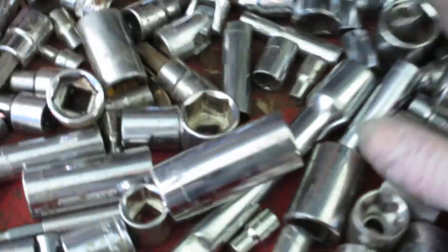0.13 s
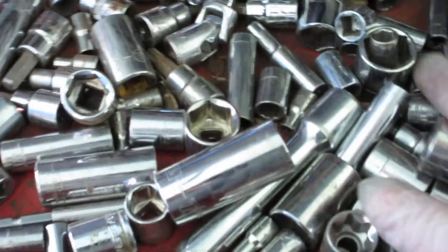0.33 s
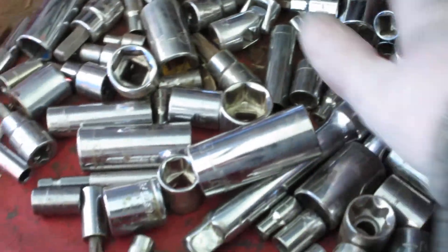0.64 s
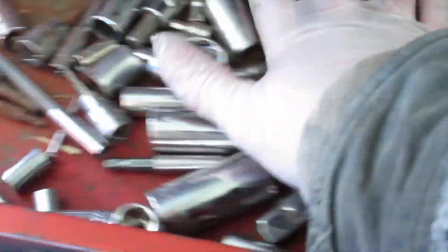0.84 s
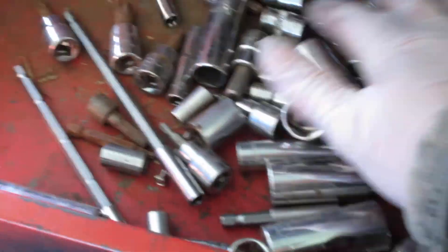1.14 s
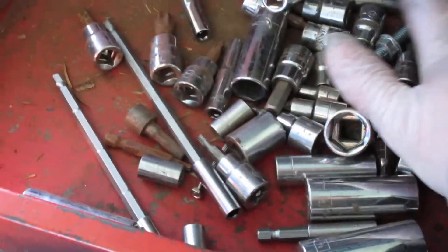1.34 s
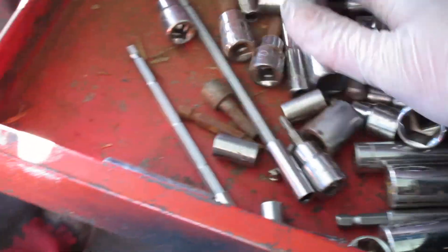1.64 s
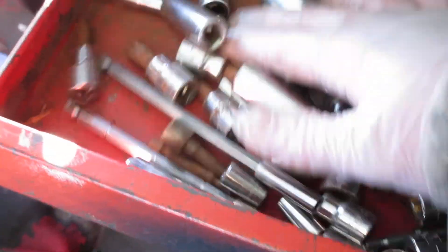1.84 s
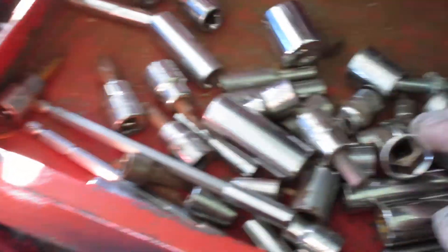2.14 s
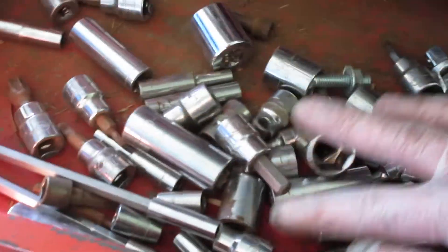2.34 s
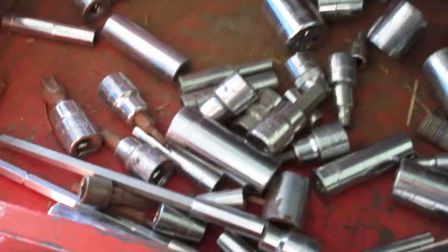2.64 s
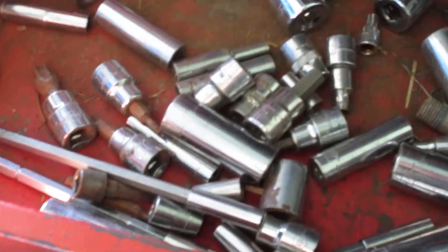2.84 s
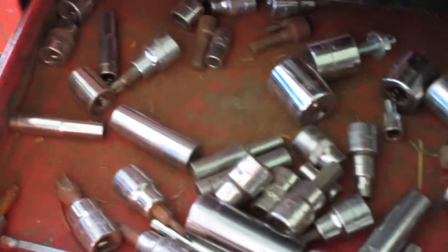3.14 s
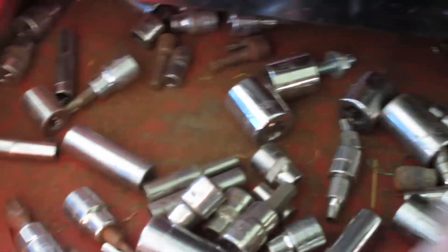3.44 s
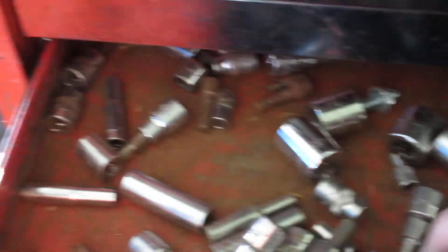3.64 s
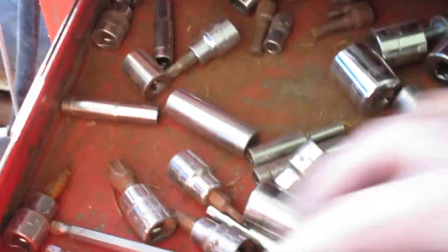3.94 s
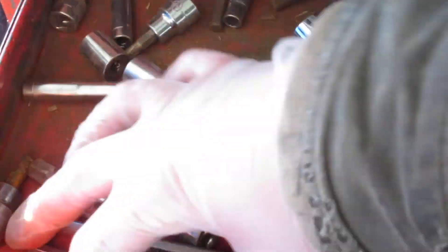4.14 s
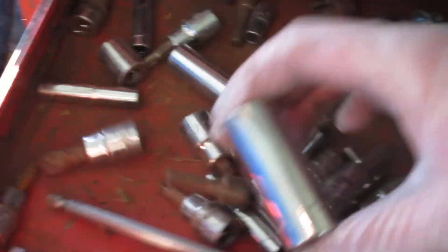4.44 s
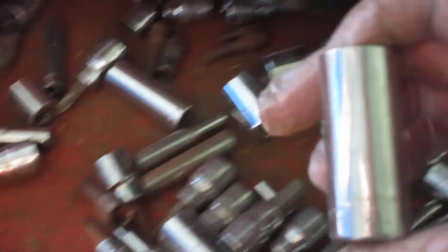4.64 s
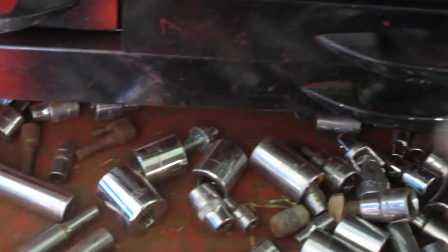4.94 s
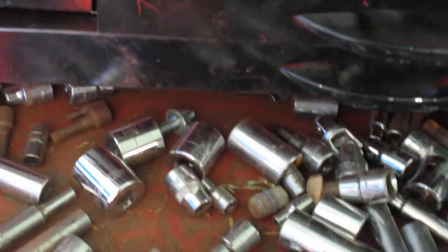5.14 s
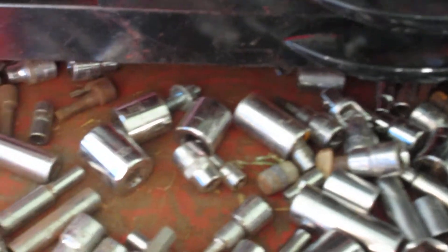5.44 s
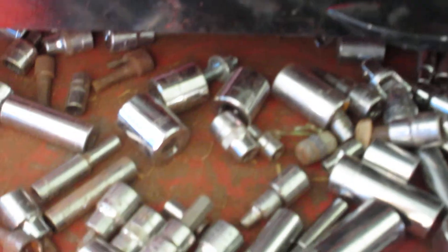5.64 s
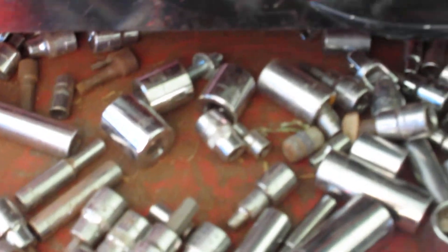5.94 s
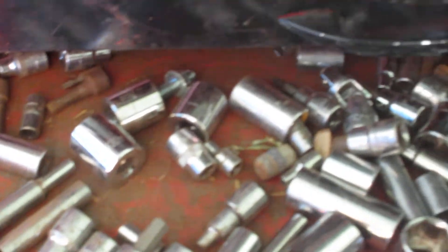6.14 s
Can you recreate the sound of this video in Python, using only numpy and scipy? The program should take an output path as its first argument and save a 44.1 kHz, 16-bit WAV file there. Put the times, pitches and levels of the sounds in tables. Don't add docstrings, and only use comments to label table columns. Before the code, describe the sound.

Close-up metallic rummaging: steel sockets bang together, scrape and roll over a thin metal drawer, some singing briefly at high pitch before being damped. Busy surges fill the first three seconds, shorter handfuls follow, then a quiet second with soft cloth rubbing and low room tone. A final hard clank and rattle ends it. Short, small-workshop reflections; treble-rich but slightly limited camera sound.

```python
import sys
import numpy as np
from scipy import signal
from scipy.fft import rfft, irfft
from scipy.io import wavfile
from scipy.ndimage import uniform_filter1d

SR = 44100
rng = np.random.default_rng(int(sys.argv[2]) if len(sys.argv) > 2 else 0)


def transcribe(signal):
    frames = np.atleast_2d(signal).T
    limited = np.clip(frames, -1, 1)
    pcm = np.round(limited * 32767).astype(np.int16)
    wavfile.write(sys.argv[1], SR, pcm)


def elevation(decibels):
    levels = np.asarray(decibels, float)
    return 10 ** (levels / 20)


N = 277830

# pitch_hz, level_db, t60_s
DRAWER = [(283, 2, 0.049), (356, 1, 0.03), (415, -1, 0.064), (507, 2.5, 0.028), (595, -13.5, 0.054),
          (750, -3, 0.027), (927, -9, 0.066), (1095, -6, 0.025)]
# frequency_hz, level_db
STEEL = [(15, -39), (25, -76), (152, -29.5), (274, -6), (433, -8), (567, 4), (631, 0), (919, 0.5),
         (1110, -7), (1800, -1), (12200, -10), (14300, -24.5), (15500, -22)]


def along(points, hz):
    point_hz, values = np.transpose(points)
    return np.interp(np.log(hz + 1), np.log(point_hz + 1), values)


def unit(x):
    return x / np.sqrt(np.mean(x ** 2) + 1e-20)


def coloured(x, points):
    cepstrum = irfft(np.log(elevation(along(points, np.fft.rfftfreq(4096, 1 / SR))) + 1e-6))
    cepstrum[1:2048] *= 2
    cepstrum[2049:] = 0
    response = irfft(np.exp(rfft(cepstrum)))[:2048]
    response = response.reshape((1,) * (x.ndim - 1) + (-1,))
    return signal.fftconvolve(x, response, axes=-1)[..., :x.shape[-1]]


def without_bass(x):
    return coloured(x, [(40, -70), (270, 0)])


def split(x):
    low_hz, high_hz = 1100, 5200

    def cut(hz, kind):
        return signal.sosfilt(signal.butter(3, hz, kind, fs=SR, output="sos"), x)

    return cut(low_hz, "low"), cut([low_hz, high_hz], "band"), cut(high_hz, "high")


def crest(rows, size):
    return rows / np.sqrt(abs(uniform_filter1d(2 * rows ** 2, size)).max(axis=1, keepdims=True))


def place(rows, first):
    at = first + np.arange(rows.shape[1])
    return np.bincount(at.ravel(), rows.ravel(), N + SR)[:N]


def sample_at(s):
    return np.round(s * SR).astype(int)


def clinks(count, t, low_hz, high_hz, t60):
    out = 0
    for pitch, size, life in rng.random((count, 3, 7, 1)).transpose(2, 1, 0, 3):
        hz = low_hz * (high_hz / low_hz) ** pitch
        decay_db = -10 * size - 60 * t / (t60 * (.5 + life))
        out = out + elevation(decay_db) * np.sin(2 * np.pi * hz * t)
    return out


def singers():
    # start_s, pitch_hz, level_db, life_s
    free = [(0, 14630, -51, .13), (.17, 14420, -39, .065), (.31, 14470, -53, .05), (.862, 14640, -50, .06),
            (1.04, 7240, -46, .033), (1.979, 9580, -37, .037), (2.46, 11690, -30, .06),
            (2.713, 12630, -43, .22), (2.74, 14470, -59, .15), (2.85, 11650, -69, .06),
            (3.48, 13500, -70, .1), (3.728, 14640, -37, .25), (3.745, 12680, -38, .16),
            (3.75, 4995, -26, .075), (3.75, 9560, -36, .025), (4.42, 11120, -45, .06),
            (4.535, 12070, -39, .04), (4.595, 12100, -47, .035), (4.62, 7300, -60, .08)]
    # start_s, pitch_hz, level_db
    wedged = [(.163, 13180, -25), (.258, 5030, -31), (.375, 12740, -42), (.368, 5020, -31),
              (.37, 14570, -35), (1.111, 12260, -24.5), (1.118, 12100, -33), (1.39, 3400, -42),
              (1.45, 11770, -14), (1.54, 12170, -38), (1.651, 11300, -34), (1.728, 12080, -20),
              (1.804, 12310, -32), (1.809, 12070, -28), (1.866, 12140, -35), (1.887, 12070, -34),
              (1.93, 9500, -36), (1.979, 7230, -22), (1.98, 12360, -24), (1.712, 7230, -22),
              (1.787, 7250, -35), (2.444, 12230, -28), (2.484, 13230, -22), (2.612, 12300, -36),
              (2.713, 14700, -35), (3.129, 9400, -32), (3.173, 9600, -25.5), (3.226, 9340, -37),
              (3.363, 1500, -55.5), (3.415, 1700, -38.5), (3.614, 9520, -45), (3.655, 12160, -37),
              (4.13, 7450, -32.5), (4.262, 13440, -49), (4.284, 7210, -38), (4.288, 12100, -47),
              (4.417, 11120, -42), (4.433, 13930, -39), (4.507, 12400, -45), (4.51, 7220, -30.5),
              (4.829, 1760, -54)]
    # start_s, pitch_hz, level_db
    blips = [(0.368, 12150, -22.5), (1.178, 12260, -23), (1.672, 12430, -24), (2.413, 9600, -32),
             (2.529, 10160, -29), (2.565, 5600, -20.5), (2.584, 4930, -25), (2.584, 9370, -23),
             (3.058, 3870, -18.5), (3.172, 6300, -42), (3.226, 6700, -43), (3.761, 9900, -34),
             (3.822, 9730, -36), (3.845, 9500, -31)]
    free_t60_s, wedged_t60_s, blip_t60_s, wedged_life_s = .3, 0.073, 0.036, .04
    return ([(s, hz, db, free_t60_s, life) for s, hz, db, life in free]
            + [(*row, wedged_t60_s, wedged_life_s) for row in wedged]
            + [(*row, blip_t60_s, wedged_life_s) for row in blips])


def rings():
    twin_step, twin_db, twin_t60_s = 1.027, -5, .03
    out = np.zeros(N + SR)
    for s, hz, db, t60, life in singers():
        t = np.arange(int((life + .03) * SR)) / SR
        drift = 0.0068 / np.sqrt(t60) * np.cumsum(rng.standard_normal(SR // 2))[:len(t)]
        onset = 1 - np.exp(-t / 0.00036)
        touch = elevation(-60 * np.maximum(t - life, 0) / 0.036)
        waver = 1 + 0.14 * np.sin(3 * drift)
        ring = elevation(db - 60 * t / t60) * onset * touch * waver * np.sin(2 * np.pi * hz * t + drift)
        twin = elevation(db + twin_db - 60 * t / twin_t60_s) * np.sin(2 * np.pi * hz * twin_step * t + drift)
        out[round(s * SR):][:len(t)] += ring + twin
    return out[:N]


def background():
    # time_s, level_db
    gain = [
        (0, -61),
        (.55, -89),
        (1.4, -81),
        (2.2, -82.5),
        (2.9, -79),
        (3.3, -74.5),
        (5.03, -74),
        (5.2, -68.5),
        (5.9, -69),
        (6.3, -74.5),
    ]
    t = np.arange(N) / SR
    gain_db = np.interp(t, *np.transpose(gain))
    hum = np.sqrt(2) * np.sin(2 * np.pi * 70.6 * t)
    # frequency_hz, level_db
    air = [(40, -28.5), (190, -16), (305, -8), (410, -9), (666, -15.5), (1170, -12), (2060, -19.5),
           (10400, -28), (15500, -38.5)]
    return elevation(gain_db) * (hum + elevation(9.5) * unit(coloured(rng.standard_normal(N), air)))


def heap():
    # peak_s, swell_s, settle_s, scrape_db, rumble_over_scrape_db
    sweeps = [(0.146, 0.14, 0.28, -18, -3.5), (.33, 0.11, 0.21, -35.5, -6.5), (.617, 0.01, 0.14, -31, -27),
              (.724, 0.019, 1, -36.5, -11), (.852, 0.24, 0.41, -23.5, -4.5), (1.088, 1, 0.14, -37, 1.5),
              (1.298, 0.54, 0.19, -44.5, 8), (1.735, 0.41, 0.59, -21, -1.5), (2.05, .2, 0.11, -40, -1),
              (2.2, 0.032, 0.1, -45, 7.5), (2.41, 0.064, 0.32, -28, -10.5), (2.485, 0.1, 0.3, -26.5, 0),
              (2.76, .06, 0.19, -44, 2.5), (3.047, 0.12, 0.16, -30, -5.5), (3.754, 0.11, 0.19, -23, -2),
              (4.166, 0.11, 0.26, -38, -6), (4.416, 0.13, .09, -25, -2), (4.542, 0.089, 0.17, -29.5, 4),
              (4.74, 0.033, 0.23, -46.5, -1), (3.43, 0.13, 0.52, -56, -1), (5.958, 0.017, 0.08, -51.5, 15),
              (6.072, 0.024, 0.22, -33.5, -1.5)]
    swell_db, rest_db = 30, -84
    rounding = 1.137
    jingle_db, jingle_grows = -9, 1.24
    peak, swell, settle, db, rumble_db = np.transpose(sweeps)[:, :, None]
    t = np.arange(N) / SR - peak
    push_db = db - swell_db * np.maximum(-t / swell, t / settle) ** rounding

    def total(levels):
        power = (elevation(levels) ** 2).sum(axis=0) + elevation(rest_db) ** 2
        return 20 * np.log10(np.sqrt(power))

    scrape_db = total(push_db)
    return total(push_db + rumble_db), scrape_db, jingle_db - 29.5 + jingle_grows * (scrape_db + 30.0)


def pings():
    when, which, size = rng.random((110, 3)).T[:, :, None]
    sockets = np.array(singers())
    hz = sockets[(which * len(sockets)).astype(int), 1]
    t = np.arange(SR // 20) / SR
    brief = elevation(10 * size - 60 * t / 0.05) * np.sin(2 * np.pi * hz * t)
    return unit(place(brief, (when * N).astype(int)))


def slide():
    rumble_db, scrape_db, jingle_db = heap()
    t = np.arange(SR // 40) / SR
    when, size = rng.random((1100, 2)).T[:, :, None]
    modes = clinks(len(when), t, 1100, 14000, t60=0.099)
    grit = 3.0 * elevation(-60 * t / 0.021) * rng.standard_normal((len(when), len(t)))
    patter = place(elevation(9 * size) * (modes + grit), (when * N).astype(int))
    scrape = 0.61 * rng.standard_normal(N)
    low, mid, high = split(coloured(unit(patter) + scrape, STEEL))

    even_rumble = split(coloured(rng.standard_normal(N), STEEL))[0]
    low = unit(low) + 1.3 * unit(even_rumble)
    t = np.arange(SR // 8) / SR
    panel = sum(elevation(level - 60 * t / ring) * np.sin(2 * np.pi * hz * t) for hz, level, ring in DRAWER)
    low = unit(low) + 0.45 * unit(signal.fftconvolve(low, panel)[:N])

    thud_colour = [(40, -43.0), (85, -3.5), (115, 6.0), (170, 2.0), (260, -29.5)]
    thud = unit(coloured(rng.standard_normal(N), thud_colour))
    thud_db = -58.0 + 0.39 * (uniform_filter1d(rumble_db, size=SR // 16) + 27.5)
    scrape_grows = 1.157
    return (elevation(rumble_db - 3.5) * unit(low)
            + elevation(-33.5 + scrape_grows * (scrape_db + 30)) * unit(mid)
            + elevation(jingle_db - 2.5) * (unit(high) + .1 * pings())
            + elevation(thud_db) * thud)


def contacts():
    # start_s, clack_db
    grazes = [(.0088, -34), (.0453, -31), (.1281, -15), (.393, -30), (.4745, -47), (.592, -28.5),
              (.697, -28.5), (1.1262, -40), (1.364, -46.5), (1.4405, -28.5), (1.449, -21.5), (1.65, -36),
              (1.683, -25), (2.144, -51), (2.2527, -62), (1.818, -22), (2.357, -52), (2.427, -26),
              (2.6115, -31), (2.655, -36), (3.0075, -60.5), (3.3632, -50), (3.3964, -45), (3.461, -39),
              (3.496, -59), (3.6077, -45), (3.614, -46), (3.68, -31.5), (3.855, -32.5), (3.94, -48.5),
              (4.17, -47), (4.3226, -37), (4.3498, -27.5), (4.497, -33), (4.6265, -38), (4.654, -46),
              (4.83, -49.5), (4.915, -49), (4.9576, -48.5), (6.2496, -51)]
    # start_s, clack_db, boom_over_clack_db, tick_over_clack_db
    blows = [(.1376, -11, -4.5, -1.5), (.1627, -11, -16, -5), (.1888, -14, 0, -8.5),
             (.2068, -11, -7.5, -13.5), (.235, -7.5, -2.5, -14.5), (.5964, -17.5, -1, 2),
             (.6068, -13.5, -2, 1), (.701, -11.5, -32, -5), (.8557, -7, -2.5, -6), (1.002, -15, -6.5, -7),
             (1.0734, -10.5, 0, -15), (1.2848, -21, 3.5, -9.5), (1.4588, -22, -7.5, 2.5),
             (1.4699, -11, -11, -2), (1.7114, -12.5, -12, -1.5), (1.8601, -17, -21, -5.5),
             (1.962, -15, -28, -10), (2.0177, -10.5, -8.5, -13), (2.4934, -11.5, -6, -4),
             (2.5976, -16.5, -7.5, -7.5), (2.7012, -9.5, -4, -4), (2.7119, -12, -5.5, -2),
             (2.7495, -12.5, 0.5, -16), (3.7292, -10, -7.5, -4), (4.4153, -16, -27, -13),
             (4.5243, -10.5, -3, -17.5), (4.5553, -17.5, -2, -23), (5.9385, -8.5, -9, -2),
             (6.0516, -8.5, -1.5, -4), (6.0629, -14, -9, 2.5)]
    # start_s, clack_db, boom_over_clack_db
    drops = [(0.114, -36, 7), (0.296, -24, 5), (0.308, -30.5, -8), (0.638, -18.5, -3.5), (.769, -16, -4),
             (.836, -19.5, -8), (0.9567, -18, -5.5), (0.9664, -19, -3.5), (1.1112, -27.5, -0.5),
             (1.383, -39, 6), (1.5592, -22, -15), (1.835, -22, 1), (2.0826, -25.5, 0), (2.197, -28, -9.5),
             (3.0982, -33, -9.5), (3.1286, -41, 3), (3.4763, -30.5, -5.5), (4.163, -43, 6),
             (4.2727, -33.5, -1), (4.3662, -31, 8.5), (4.3766, -26.5, -7), (4.43, -18.5, -1.5),
             (4.461, -25, 7), (4.6082, -29, 5), (4.704, -47, 4), (4.723, -31.5, -9.5), (5.9614, -32, 13),
             (5.987, -25, 2.5), (6.081, -17, -3), (6.1122, -22, 3.5), (6.177, -23, 1)]
    # start_s, clack_db
    clacks = [(.0508, -19.5), (.071, -20), (.3408, -31), (.3662, -22.5), (.416, -32), (.7245, -20.5),
              (.8445, -12), (.981, -20), (1.1779, -25), (1.207, -24), (1.2583, -33), (1.504, -27),
              (1.9089, -22), (1.9475, -19.5), (2.09, -33), (2.1634, -23), (2.3859, -20.5), (2.6768, -29.5),
              (2.9504, -36.5), (2.9868, -30.5), (3.4143, -45), (3.4281, -38.5), (3.6249, -27),
              (3.6362, -33.5), (4.1414, -33), (4.182, -20.5), (4.284, -26.5), (4.5065, -25),
              (4.5482, -15.5), (6.004, -21)]
    # start_s, clack_db, tick_over_clack_db
    ticks = [(.15, -14.5, -8), (.49, -58, 3), (.797, -24.5, 0.5), (0.869, -19, -1.5), (.898, -28, 1),
             (.948, -21.5, -2.5), (1.165, -53, -4), (1.533, -27, -5), (1.5426, -22.5, -4),
             (1.585, -29.5, 2), (1.6213, -30.5, 3), (1.731, -20, 3), (1.81, -27, -2), (1.851, -14.5, -11),
             (1.932, -18.5, -3), (2.029, -23.5, 1.5), (2.051, -43, 8), (2.4027, -35, 1), (2.444, -27, 2),
             (2.46, -15, -0.5), (2.487, -22.5, 7), (2.556, -34, -5), (2.567, -21.5, -1),
             (2.5844, -33.5, 12.5), (2.622, -31, -1), (2.6346, -29, -4), (3.025, -22.5, 4.5),
             (3.0369, -20.5, -6), (3.047, -24, 6.5), (3.0602, -26, 6), (3.119, -49, 9), (3.173, -49, 2),
             (3.195, -62, 0), (3.2268, -38, -1), (3.6494, -20.5, 0), (3.701, -34, 1), (3.717, -34, 0),
             (3.761, -30, 10), (3.776, -22.5, -1), (3.786, -23.5, -2), (3.82, -29, -2), (3.835, -28.5, -8),
             (3.845, -46, -1), (4.13, -26.5, -8), (4.2157, -37, -2), (4.261, -37.5, -0.5),
             (4.395, -21, 3.5), (4.579, -26, -5), (4.5845, -20, -1), (5.058, -49, -1)]
    # start_s, clack_db
    thuds = [(.325, -34.5), (.829, -27.5), (.936, -34.5), (1.569, -34.5), (1.795, -26), (1.877, -34),
             (2.036, -27), (2.121, -59), (2.415, -38.5), (2.518, -27.5), (2.546, -31.5), (2.691, -45.5),
             (3.141, -44.5), (3.691, -59), (4.189, -48), (4.448, -39.5), (4.586, -32)]
    drop_tick_db, tick_boom_db = -12, -17
    kinds = [(clacks, (-10, -12)), (grazes, (-11, -12)), (thuds, (7, -14.5))]
    return (blows
            + [(*row, drop_tick_db) for row in drops]
            + [(s, db, tick_boom_db, tick_db) for s, db, tick_db in ticks]
            + [(*row, *colour) for rows, colour in kinds for row in rows])


def knocks():
    s, db, boom_db, tick_db = np.transpose(contacts())[:, :, None]
    t = np.arange(SR // 11) / SR
    luck = rng.standard_normal((len(s), 2 + 2 * len(DRAWER)))
    t60 = 0.035 * elevation(2.9 * luck[:, :1] + 0.011 * db)
    attack = .0007 * elevation(12 * np.clip(luck[:, 1:2], -2, .3))
    burst = (1 - np.exp(-t / attack)) * (elevation(-60 * (t / t60) ** 1.395) + elevation(-10.0 - 60 * t / 0.07))
    jostle = burst * rng.standard_normal((len(s), len(t)))
    modes = crest(clinks(len(s), t, 1000, 14000, t60=0.023), size=170)
    low, clack, tick = split(coloured(jostle + 0.76 * modes, STEEL))

    panel = 0
    for k, (hz, level, ring) in enumerate(DRAWER):
        spot_hz = hz * (1 + 0.044 * luck[:, [-1 - k]])
        panel = panel + elevation(level + 1.5 * luck[:, [2 + k]] - 60 * t / ring) * np.sin(2 * np.pi * spot_hz * t)
    boom = 0.43 * crest(low, size=300) + 1.2 * crest(coloured(panel, STEEL), size=300)

    thump = elevation(-60 * t / 0.035) * np.sin(2 * np.pi * 95 * t) * (1 - np.exp(-t / .003))
    thump_db = -28 + .3 * boom_db
    rows = elevation(db) * (crest(clack, size=170)
                      + elevation(boom_db) * crest(boom, size=300)
                      + elevation(thump_db) * thump
                      + elevation(tick_db) * crest(tick * elevation(-60 * t / 0.045), size=170))
    return place(rows, sample_at(s))


def bodies():
    # start_s, level_db, socket_hz, floor_hz
    struck = [(0.049, -10, 1780, 844), (0.1352, -1.5, 3580, 517), (0.162, -5.5, 1860, 522),
              (.295, -12, 1270, 750), (.636, -9, 2840, 890), (.767, -20.5, 2000, 523), (1.0, -9, 2150, 728),
              (1.7107, -10, 4420, 930), (1.73, -6, 1260, 670), (1.859, -8.5, 3270, 566),
              (1.9607, -11.5, 2960, 917), (2.4585, -9, 2200, 857), (2.492, -11.5, 2100, 790),
              (2.711, -2, 3980, 404), (3.475, -24, 1610, 788), (3.6237, -29.5, 1510, 810),
              (3.648, -18, 1480, 806), (4.393, -15, 1520, 580), (4.4154, -9.5, 3000, 585),
              (0.186, 2, 1370, 790), (0.206, -4.5, 1790, 848), (0.234, -1.5, 1740, 454),
              (0.596, 1.5, 1710, 490), (0.605, -2, 3760, 517), (0.699, -6.5, 1730, 284),
              (0.854, -10, 1550, 545), (1.074, -7, 1950, 582), (1.282, 0.5, 425, 282),
              (1.469, -9, 2430, 286), (2.016, -2.5, 1590, 255), (2.162, -17.5, 2020, 720),
              (2.597, -8, 1700, 886), (2.7, -1, 3180, 397), (2.749, -12.5, 2870, 815),
              (3.727, -3, 1840, 403), (4.181, -16, 6070, 776), (4.523, -4, 2190, 273),
              (4.719, -15, 2510, 820), (5.938, 6.5, 3217, 522), (6.051, -3.5, 2300, 518),
              (6.062, -2, 2430, 293), (6.109, -12, 1500, 517), (6.178, -11, 1750, 843)]
    s, db, body_hz, spot_hz = np.transpose(struck)[:, :, None]
    t = np.arange(SR // 11) / SR
    chatter = unit(uniform_filter1d(rng.standard_normal((len(s), len(t))), size=130))

    def note(hz, level_db, t60):
        return elevation(level_db - 60 * t / t60) * np.sin(2 * np.pi * hz * t + 0.88 * chatter)

    both = note(body_hz, -5.5, t60=0.018) + note(spot_hz, -8.5, t60=0.038)
    rows = elevation(db) * (1 - np.exp(-t / 0.0013)) * both
    return place(without_bass(rows), sample_at(s + .001))


def shop(x):
    # frequency_hz, t60_s
    decay = [(200, 0.12), (2000, 0.21), (10000, 0.11)]
    # frequency_hz, level_db
    walls = [(300, -2.5), (2000, -1.5), (6000, -2), (12000, -1)]
    out, step = np.zeros(N + 2 * SR), SR // 5
    for start in range(0, N, step):
        hz, t, z = signal.stft(rng.standard_normal(SR // 2), SR, nperseg=256)
        tail = signal.istft(z * elevation(-60 * t / along(decay, hz)[:, None]), SR, nperseg=256)[1]
        wet = signal.fftconvolve(x[start:start + step], tail / np.linalg.norm(tail))
        out[start + 300:][:len(wet)] += wet
    return coloured(out[:N], walls)


def side_notes():
    # start_s, pitch_hz, level_db
    touches = [(.5975, 3360, -13), (0.606, 4810, -16), (0.7006, 3040, -9), (.7015, 5320, -10),
               (.723, 3340, -9.5), (1.131, 4200, -43), (1.166, 4450, -44), (1.166, 8350, -48),
               (1.209, 2500, -24), (1.246, 3000, -38), (1.364, 2190, -38), (1.418, 3060, -44),
               (2.018, 1593, -7.5), (2.018, 2680, -28), (2.02, 3610, -17), (2.204, 2170, -28),
               (2.25, 1480, -43), (2.379, 3460, -33), (2.702, 1780, -18), (3.362, 3810, -48),
               (3.369, 5920, -55), (3.415, 4800, -40), (3.463, 4800, -42), (5.939, 1504, -17),
               (5.939, 280, -12), (4.956, 2500, -56), (1.6, 11300, -34), (1.13, 9000, -45),
               (5.94, 4920, -7.5), (5.987, 2290, -24), (6.02, 1600, -36), (6.052, 3720, -23),
               (6.052, 1544, -16), (6.064, 2340, -11)]
    s, hz, db = np.transpose(touches)[:, :, None]
    t = np.arange(SR // 20) / SR
    noise = rng.standard_normal((2, len(s), len(t)))
    roughness = .6 * unit(uniform_filter1d(noise[0], size=90))
    note = elevation(-60 * t / 0.03) * np.sin(2 * np.pi * hz * t + roughness)
    click = elevation(-6 - 60 * t / 0.0093) * unit(coloured(noise[1], STEEL))
    rows = elevation(db) * (1 - np.exp(-t / 0.00093)) * (note + click)
    return place(without_bass(rows), sample_at(s))


def snaps():
    # peak_s, level_db, half_width_s
    pushes = [
        (1.2855, -3, 0.00042),
        (2.0185, -12.5, 0.00035),
        (5.9395, -15.5, 0.00047),
    ]
    s, db, width = np.transpose(pushes)[:, :, None]
    u = np.clip((np.arange(N) / SR - s) / width, -9, 9)
    pulses = elevation(db) * (u * u - 1) * np.exp(-u * u / 2)
    return without_bass(pulses.sum(axis=0))


def rustle():
    # start_s, end_s, level_db, centre_hz
    strokes = [(3.6, 3.618, -47, 7000), (4.017, 4.123, -49, 6000), (4.85, 4.954, -57.5, 3470),
               (4.979, 5.062, -62.5, 7100), (5.053, 5.112, -58, 5870), (5.106, 5.142, -53.5, 6270),
               (5.356, 5.39, -61, 8000), (5.417, 5.455, -55.5, 7600), (5.511, 5.614, -62.5, 8400),
               (5.641, 5.674, -61, 8540), (5.779, 5.837, -63.5, 7870), (2.935, 2.97, -51, 8000)]
    out = np.zeros(N)
    for start, end, db, hz in strokes:
        t = np.arange(SR // 5) / SR
        hiss = coloured(rng.standard_normal(len(t)), [(hz / 8, -24), (hz / 2, -9), (hz, 0), (20000, -16)])
        swell = elevation(2 * unit(uniform_filter1d(rng.standard_normal(len(t)), size=250)))
        stroke = np.clip(np.minimum(t / 0.018 + 0.37, (end - start - t) / 0.025 + .5), 0, 1) ** 2
        out[round(start * SR):][:len(t)] += elevation(db) * unit(hiss) * swell * stroke
    return out


def scene():
    tones = rings()
    blows = elevation(-0.5) * knocks()
    room = elevation(-14) * shop(blows + elevation(-7) * tones)
    struck = blows + bodies() + side_notes() + snaps()
    mix = tones + struck + room + slide() + rustle() + background()
    return mix[None]


def roll_off(x):
    return signal.sosfilt(signal.butter(12, 16370, fs=SR, output="sos"), x)


def record(dry):
    limited = dry / (1 + abs(dry) ** 8) ** (1 / 8)
    finished = signal.sosfilt(signal.ellip(8, .5, 30, 14950, fs=SR, output="sos"), limited)
    return roll_off(finished)


dry = scene()
out = record(dry)
transcribe(out)
```